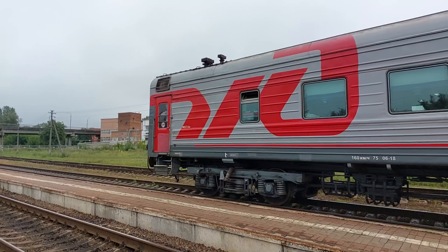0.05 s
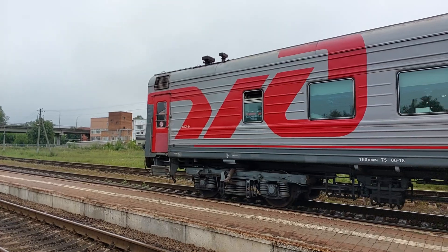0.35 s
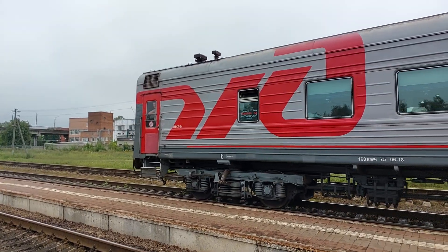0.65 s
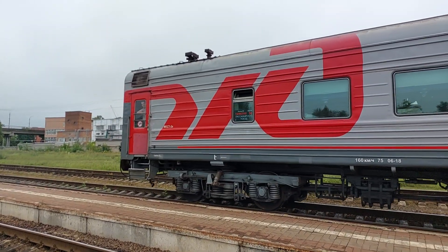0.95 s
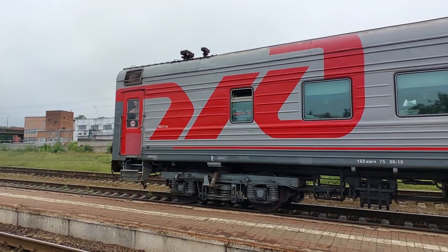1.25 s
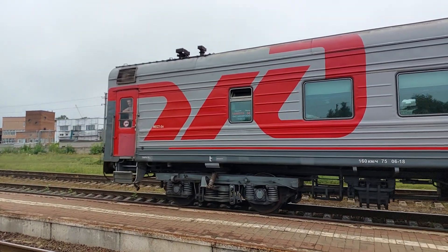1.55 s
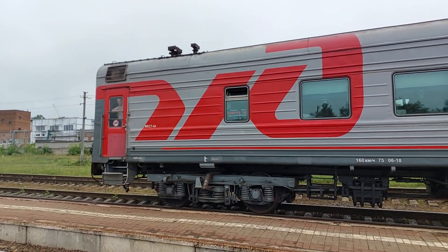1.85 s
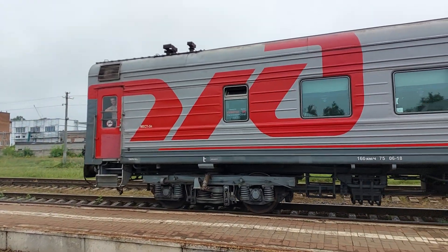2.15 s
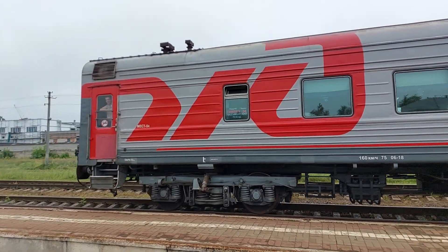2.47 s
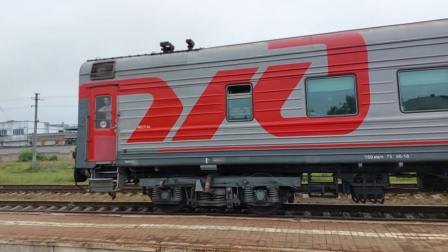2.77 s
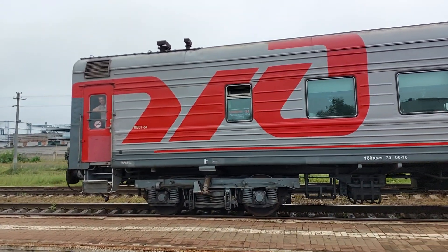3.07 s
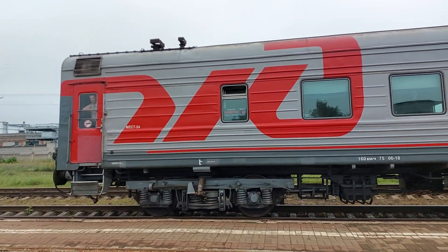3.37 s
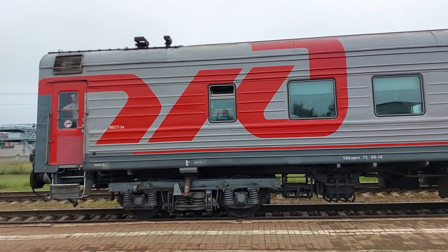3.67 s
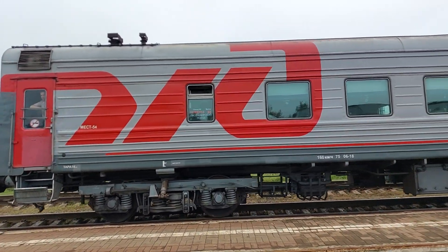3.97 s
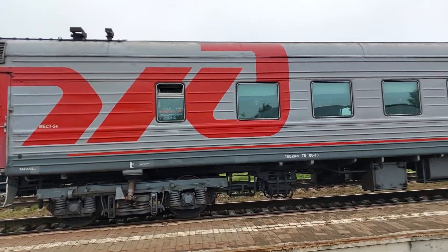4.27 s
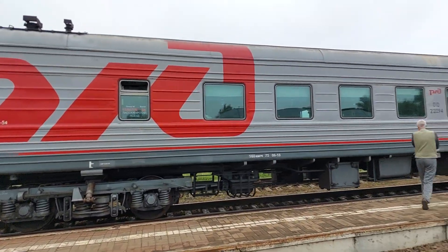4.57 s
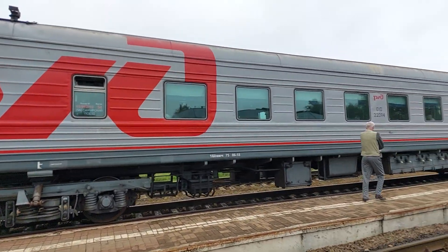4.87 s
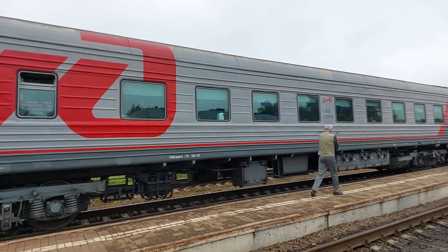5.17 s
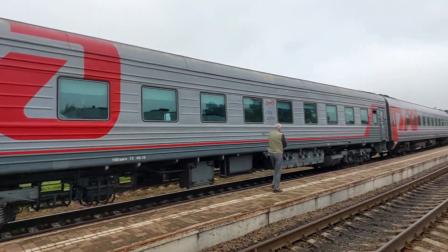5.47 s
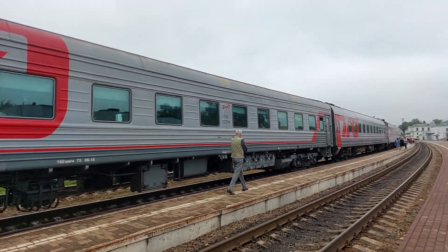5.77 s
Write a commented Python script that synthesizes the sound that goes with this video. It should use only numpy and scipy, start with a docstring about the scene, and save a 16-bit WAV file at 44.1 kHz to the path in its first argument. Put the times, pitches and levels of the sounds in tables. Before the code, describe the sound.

High brake squeals ring over a slow passenger train's rumble, then air hisses and the coaches knock and thump to a halt.

```python
"""A low rumble of wheels, the rush of a fan and a thin converter whine: passenger coaches creep along an
open-air platform. A brake shoe scrapes a wheel and sets it ringing, and wheel after wheel squeals as it
sticks and slips. Air hisses from the brake valve, the running gear clanks, and the hollow coach body
booms and thumps as the train comes to rest under the last squeals."""
import sys
import numpy as np
from scipy import signal
from scipy.fft import rfft, irfft, next_fast_len
from scipy.io import wavfile
from scipy.ndimage import uniform_filter1d, map_coordinates

SR = 44100
rng = np.random.default_rng(int(sys.argv[2]) if len(sys.argv) > 2 else 0)


def to_wav(sig):
    """Store sig (one row per channel, or 1-D mono) as 16-bit WAV at the path in sys.argv[1].

    Samples outside -1..1 are clipped; the rate is SR.
    """
    pcm = np.clip(np.atleast_2d(sig), -1, 1) * 32767
    pcm = np.round(pcm).astype(np.int16)
    wavfile.write(sys.argv[1], SR, pcm.T)  # frames by channels


N = 261513
TIME = np.arange(N) / SR

# Table levels are relative: each layer adds its own gain.
# rolling bed: t/s, deep rumble/dB, body noise/dB
ROLL_LEVEL = [(0.0, -32, -38.5), (1.01, -28.5, -38), (1.53, -36, -43), (3.35, -31.5, -39.5),
              (4.46, -32.5, -39), (4.51, -27.5, -37.5), (4.89, -32, -40), (4.94, -36, -37.5),
              (5.05, -27, -39.5), (5.14, -30.5, -36), (5.25, -24, -34.5), (5.47, -29.5, -35),
              (5.5, -22, -34.5), (5.6, -30.5, -35), (5.75, -24, -37), (5.78, -27.5, -34.5),
              (5.93, -28, -37)]
# colour of the deep rumble: f/Hz, level/dB
DEEP_COLOUR = [(28, -18), (37, -3.5), (44, 2.5), (64, 2), (80, -6), (92, -8.5), (120, -11), (138, -4),
               (170, -23)]
# colour of the body noise: f/Hz, level/dB
BODY_COLOUR = [(150, -7), (200, -10), (275, -7.5), (400, -11), (520, -13.5), (590, -17), (800, -15.5),
               (950, -16), (1150, -22.5), (1500, -37.5)]
# direction of the coach: t/s, lead at the left ear/ms
BEARING = [(0, 0.49), (1.3, 0.51), (3.3, .51), (4.9, 0.35), (5.9, 0.18)]
# rush of the fan: t/s, level/dB
FAN_LEVEL = [(0, -49.5), (1.3, -49), (2.1, -52), (2.7, -51), (3.4, -47.5), (5.0, -49), (5.5, -45.5),
             (5.93, -49.5)]
# colour of the fan: f/Hz, level/dB
FAN_COLOUR = [(900, -7), (1100, -13), (1400, -4), (1710, 1), (2170, -2.5), (2500, -3), (2800, -7.5),
              (3800, -11), (4600, -14), (5200, -13.5), (6300, -20.5), (7400, -29.5), (12000, -40)]
# the converter's narrow beam sweeps past: t/s, level/dB, left-right/dB
WHINE_LEVEL = [(0.0, -27.5, -16), (0.32, -26, 4), (0.48, -24.5, -12), (0.96, -28, -4), (1.04, -22.5, -11),
               (1.44, -25, 0), (1.6, -22.5, -17), (1.76, -28, -1), (2.48, -32, -11), (2.56, -35.5, -12),
               (2.88, -26, 7), (3.2, -23, -15), (3.44, -27, 4), (3.56, -27, 2), (4.32, -36, 3),
               (4.84, -59, -27)]
# grain of the whine: t/s, noisy share/0-1
WHINE_ROUGHNESS = [(1.8, 0.24), (2.8, 0.12), (4.8, 0)]
# the lowest wheel mode locks on under the shoe: start/s, rise/s, hold/s, fall/s, f/Hz, level/dB
GROAN = (1.0, 0.54, 0.14, 0.46, 2271, -40)
# its twin joins: start/s, rise/s, hold/s, fall/s
GROAN_TWIN = (1.334, 0.21, 0.24, 0.15)
# single wheels squeal: start/s, rise/s, hold/s, fall/s, f/Hz, glide/(Hz/s), level/dB, noisy share/0-1,
# throb rate/Hz (either sign), left-right/dB
SQUEALS = [(1.108, 0.042, .04, 0.23, 13005, 0, -39, 0.35, -1, 0),
           (1.122, 0.12, 0.09, .05, 3398, -2, -43, 0.1, 0, -5),
           (1.36, 0.022, 0.3, .07, 3399, -23, -45, 0, 1, 0),
           (1.122, 0.086, 0.18, 0.09, 10740, -5, -45.5, 0.24, -1, 2),
           (1.452, 0.12, .05, 0.44, 12995, 3, -46, 0.3, 3.5, 10),
           (1.78, .035, 0.059, .04, 4545, 0, -50, 0, 15, 6),
           (2.217, 0.029, 0.015, 0.066, 5310, -500, -42, 0.64, 7, -5),
           (2.314, 0.026, .01, .07, 5180, -1500, -43.5, 0.8, 2, -5),
           (2.671, 0.061, 0.41, 0.39, 7915, -100, -57, 0.59, -0.5, -5),
           (3.023, 0.06, 0.064, 0.13, 12520, 300, -55, 0.6, 0, -5),
           (3.136, 0.2, 0.012, 0.16, 4400, 90, -51.5, 0.4, -6.5, 18),
           (3.312, .07, .09, .1, 12680, 500, -55.5, .7, 0, -4),
           (3.368, 0.16, 0.13, 0.083, 6390, -200, -45.5, 0.47, 3.5, -5),
           (3.537, 0.11, 0.24, 0.096, 12640, -100, -51.5, 0.64, 0.5, -2.5),
           (4.645, 0.076, 0.07, 0.2, 5400, -250, -44.5, 0.16, 3, 8),
           (4.79, 0.086, 0.13, 0.24, 6010, 0, -39.5, 0.15, 10.5, -1.5),
           (5.024, 0.051, 0.039, 0.05, 6010, 0, -30, 0, -2, -2.5),
           (5.125, 0.053, 0.027, 0.034, 6010, 0, -26, 0.01, 0, -4.5),
           (5.23, 0.028, 0.11, 0.13, 6000, 0, -33, 0, -0.5, -5),
           (5.037, 0.065, 0.14, 0.087, 5148, 3, -32.5, 0.28, 16.5, 4),
           (5.24, .06, .04, .1, 6810, -900, -46, 0.5, 0, 3),
           (5.478, 0.059, 0.22, 0.14, 6011, 1, -44.5, 0.05, 1, 3),
           (5.35, 0.21, 0.41, .1, 6130, 4, -54, 0.14, 2.5, 0)]
# the shoe bites on a wheel: start/s, rise/s, hold/s, fall/s, wheel drive/dB, dry rasp/dB
SHOE_BITES = [(1.111, 0.0048, 0.83, 0.19, -44, -50), (1.664, 0.14, .08, 0.05, -43, -44),
              (2.253, 0.05, 0.034, 0.097, -62, -53.5)]
# colour of the dry rasp: f/Hz, level/dB
RASP_COLOUR = [(3500, 3), (5000, -14), (6300, 8), (7700, -13), (9000, -8), (11000, -2), (13000, -11),
               (15500, -5)]
# strongest wheel modes: f/Hz, level/dB
WHEEL_MODES = [(2892, -68.5), (3400, -62), (4054, -70), (4151, -64), (4544, -65.5), (4807, -72),
               (4930, -71), (5060, -64), (5600, -68), (5685, -72), (5808, -59), (5969, -65), (6207, -67),
               (6535, -63), (6745, -68), (6794, -66), (6919, -59), (6998, -67), (7511, -63), (7601, -62),
               (7724, -62), (7770, -62), (7919, -75), (8522, -72), (8619, -70), (8812, -65), (8947, -73),
               (9504, -68), (9771, -74), (10460, -67.5), (10740, -62.5), (11060, -67), (11290, -72),
               (11396, -59), (11490, -70), (11676, -68), (11843, -68), (11920, -72), (12130, -70),
               (12220, -70), (12306, -63), (12586, -70), (12742, -66), (12800, -69), (12974, -60),
               (13194, -64), (13370, -67), (13680, -69), (13840, -68), (14137, -64), (14290, -66),
               (14420, -67), (14540, -66), (14696, -67), (14927, -63)]
# contour of the crowd of weaker modes: f/Hz, level/dB
WHEEL_CROWD = [(5400, -78), (7700, -75), (9200, -83), (12000, -80), (15700, -70)]
# blows in the running gear: t/s, level/dB, low-pass corner/Hz, time to fall 40 dB/s, dry crack/dB
CLANKS = [(2.285, -44.5, 3050, 0.066, -16), (2.713, -35, 600, .04, -16), (2.718, -32, 1500, 0.042, -15),
          (2.724, -29.5, 800, 0.032, -17), (2.733, -41.5, 2200, 0.13, -13), (2.764, -41.5, 900, 0.094, -16),
          (5.101, -42, 4500, 0.067, 3.5), (5.221, -38.5, 700, 0.25, -2), (5.441, -32, 300, 0.083, -23),
          (5.515, -48, 356, 0.2, -19), (5.549, -52, 1790, 0.018, -9), (5.617, -43, 1500, .02, -15)]
# modes of the bogie frame: f/Hz, width/Hz, level/dB
FRAME_MODES = [(308, 43, 0), (776, 80, 8.5), (900, 99, 6.5), (1023, 69, 5.5), (1294, 30, -4),
               (1480, 56, 2.5), (1680, 110, -1), (2060, 37, 7), (2230, 270, 0.5), (2990, 220, -4),
               (3420, 71, -3), (3650, 160, -2.5), (5150, 670, -11)]
# wheels further down the train, close in pitch: f/Hz, level/dB
FAR_WHEELS = [(5015, -3), (5200, -2.5), (5288, 1.5), (5333, 1), (5381, -9.5), (5676, -13)]
# their chorus: t/s, level/dB
FAR_LEVEL = [(3.15, -63), (3.45, -67), (3.75, -51), (4.1, -57.5), (4.3, -54), (4.55, -60), (5.0, -49),
             (5.15, -50), (5.4, -51.5), (5.95, -61)]
# one wheel sings through the stop: t/s, f/Hz, level/dB, octave level/dB, octave left-right/dB
LONG_SQUEAL = [(3.2, 5180, -53, -71, -2), (3.45, 5200, -56, -57, 2), (3.63, 5220, -57, -49, 5),
               (3.69, 5168, -59, -48, 9), (3.95, 5180, -47.5, -47, -1), (4.21, 5196, -59, -48.5, -3.5),
               (4.26, 5300, -44, -46, -5), (4.35, 5330, -61, -44, -5), (4.5, 5325, -53, -48, -4),
               (4.76, 5332, -55, -48, -12), (5.02, 5260, -47, -53, -6), (5.08, 5100, -54, -49, -7),
               (5.25, 5148, -39, -55, -6), (5.4, 5146, -41, -61.5, -8), (5.95, 5150, -51, -65.5, -8)]
# air let out of the brakes: start/s, rise/s, hold/s, fall/s, level/dB
AIR_BURSTS = [(4.386, 0.21, 0.47, 0.33, -46.5), (5.63, 0.044, 0.0058, 0.07, -64)]
# colour of the hiss: f/Hz, level/dB
AIR_COLOUR = [(1200, 3), (2400, 4), (4000, 4.5), (5500, 4.5), (7500, -1.5), (9000, -9), (11000, 0),
              (13500, 2.5), (15700, 0)]
# the coach body booms as it rocks to a halt: start/s, rise/s, hold/s, fall/s
BOOM_SWELL = (4.8, 0.32, 0.62, 0.61)
# jolts of the stop: t/s, level/dB
JOLTS = [(5.103, -35), (5.23, -27.5), (5.298, -35), (5.37, -36)]
# modes of the coach body: f/Hz, width/Hz, level/dB
COACH_MODES = [(150.5, 27, -0.5), (364, 54, -5.5), (506, 45, -6)]
# rods and springs ring: crest/s, f/Hz, level/dB, Gaussian width/s
RIGGING_NOTES = [(5.24, 2530, -42.5, 0.027), (5.235, 3090, -46, 0.015), (5.225, 1580, -46, 0.018),
                 (5.15, 950, -39.5, 0.021), (5.372, 953, -37, 0.028)]
# the last wheel's bending squeal: t/s, f/Hz, level/dB
LAST_SQUEAL = [(5.19, 6860, -57), (5.22, 6720, -53), (5.31, 6730, -38), (5.37, 6670, -42),
               (5.47, 6630, -36.5), (5.6, 6680, -46), (5.72, 6670, -41.5), (5.8, 6700, -38),
               (5.85, 6745, -46), (5.95, 6735, -56)]

SWELL_DB = 17   # a swell climbs this far in its rise time and sinks this far in each fall time
WAVER_HZ = 10.5   # speed of a squeal's pitch waver


def from_db(db):
    """Decibels to gain."""
    return 10 ** (np.asarray(db) / 20)


def unit_power(x):
    """Scale to unit power."""
    return x / np.sqrt(np.mean(np.abs(x) ** 2) + 1e-20)


def in_time(rows):
    """The columns of a curve at every sample."""
    times, *columns = np.transpose(rows)
    return [np.interp(TIME, times, column) for column in columns]


def during(rows, fade_s=0.0026):
    """A gate that is open while a curve lasts, fading at both ends."""
    return np.clip(np.minimum(TIME - rows[0][0], rows[-1][0] - TIME) / fade_s, 0, 1)


def swell(start, rise, hold, fall):
    """Envelope of one rise, hold and fall, straight in decibels after a short fade-in."""
    age = TIME - start
    below = np.maximum(1 - age / rise, 0) + np.maximum((age - rise - hold) / fall, 0)
    return from_db(-SWELL_DB * np.minimum(below, 10)) * np.clip(3 * age / rise, 0, 1)


def flutter(width_hz, size=N):
    """Complex random envelope of a resonance: the wider, the faster it flickers; unit power."""
    step, settle = 16, 4000
    r = np.exp(-np.pi * width_hz * step / SR)
    white = rng.standard_normal((2, size * 0 + N // step + settle + 2))
    slow = signal.lfilter([1], [1, -2 * r, r * r], white[0] + 1j * white[1])[settle:]
    return np.interp(np.arange(size) / step, np.arange(len(slow)), unit_power(slow))


def panned(pan_db):
    """Left and right gains for a level difference."""
    return from_db(np.array([[.5], [-.5]]) * pan_db)


def outdoor_noise(spectrum, direct, spacing_ms=0.56):
    """Coloured noise: the direct share comes straight from the coach, the rest from all around."""
    size = next_fast_len(N)
    hz = np.arange(size // 2 + 1) * SR / size + 1e-3
    points, level_db = np.transpose(spectrum)
    skirts = np.minimum(hz / points[0], 1) ** 4 * np.minimum(points[-1] / hz, 1) ** 8
    colour = from_db(np.interp(np.log(hz), np.log(points), level_db)) * skirts
    alike = np.sinc(2 * hz * spacing_ms / 1000)   # scattered long waves reach both ears alike
    shares = np.sqrt([np.ones_like(hz), (1 + alike) / 2, (1 - alike) / 2])
    white = rfft(rng.standard_normal((3, size)))
    straight, mid, side = irfft(white * colour * shares, size)[:, :N]
    lag = in_time(BEARING)[0] * SR / 1000
    late = map_coordinates(straight, [np.arange(N) - lag], order=2, mode="mirror")
    scattered = np.array([mid + side, mid - side])
    return unit_power(np.sqrt(direct) * np.array([straight, late]) + np.sqrt(1 - direct) * scattered)


def resonate(x, hz, width_hz):
    """A resonance with gain one at its peak."""
    r = np.exp(-np.pi * width_hz / SR)
    feedback = [1, -2 * r * np.cos(2 * np.pi * hz / SR), r * r]
    return signal.lfilter(np.array([1, 0, -1]) * (1 - r * r) / 2, feedback, x + 1e-18)


def tone(hz, noisy, width_hz, ear_phase):
    """A self-sustained vibration: a clean core and an unsteady part that differs at each ear."""
    core = np.sqrt(1 - noisy) * np.exp(1j * np.array([[0], [1]]) * ear_phase)
    unsteady = np.sqrt(noisy) * np.array([flutter(width_hz, len(hz)), flutter(width_hz, len(hz))])
    carrier = np.exp(2j * np.pi * np.cumsum(hz) / SR)
    return np.sqrt(2) * np.real((core + unsteady) * carrier)


def rolling(deep_gain_db=-0.9, body_gain_db=1.5, jolt_db=0.63, body_pan_db=1.4):
    """The low bed: heavy wheels shake the track and the coach bodies."""
    deep_db, body_db = in_time(ROLL_LEVEL)
    deep = outdoor_noise(DEEP_COLOUR, direct=0.11)
    power = uniform_filter1d(np.mean(deep ** 2, axis=0), size=SR // 6)
    deep = deep / np.sqrt(power)   # the weight keeps the rumble even
    body = outdoor_noise(BODY_COLOUR, direct=0.39)
    body = body * from_db(jolt_db * flutter(21).real) * panned(body_pan_db)
    return from_db(deep_db + deep_gain_db) * deep + from_db(body_db + body_gain_db) * body


def fan(gain_db=4.5):
    """Steady rush of underfloor ventilation."""
    return from_db(in_time(FAN_LEVEL)[0] + gain_db) * outdoor_noise(FAN_COLOUR, direct=0.55)


def converter_whine(gain_db=1.0, hz=15275, sag_hz_per_s=4.5, roll_from_s=3.07, turns_per_s=2.25):
    """Switching whine: it sags, wanders between the ears, then rolls in phase as it draws level."""
    level_db, pan_db = in_time(WHINE_LEVEL)
    ears = panned(pan_db) / np.sqrt(np.mean(panned(pan_db) ** 2, axis=0))
    wander = np.clip(roll_from_s - TIME, .2, 1) * flutter(7).real
    turns = turns_per_s * np.maximum(TIME - roll_from_s, 0)
    ear_phase = 1.3 + 1.4 * wander - 2 * np.pi * turns
    whine = tone(hz - sag_hz_per_s * TIME, in_time(WHINE_ROUGHNESS)[0], width_hz=68, ear_phase=ear_phase)
    return from_db(level_db + gain_db) * ears * during(WHINE_LEVEL) * whine


def supply_hum(level_db=-41, hz=100.2):
    """Low hum of the coach's power supply."""
    return from_db(level_db) * tone(np.full(N, hz), noisy=0.24, width_hz=6.8, ear_phase=-0.14)


def groan(gain_db=4.0, twin_db=-5.5, split_hz=26, noisy=.07, width_hz=30, waver_db=1.6):
    """The wheel's lowest mode is a close pair: one starts shakily, its twin joins under load; they beat."""
    *shape, pitch_hz, level_db = GROAN
    hz = np.full(N, pitch_hz)
    waver = from_db(waver_db * flutter(24).real)
    first = swell(*shape) * waver * tone(hz - split_hz / 4, noisy, width_hz, ear_phase=-1.66)
    twin = swell(*GROAN_TWIN) * tone(hz + split_hz * 3 / 4, noisy, width_hz, ear_phase=-1.06)
    return from_db(level_db + gain_db) * (first + from_db(twin_db) * twin)


def squeals(throb_depth_db=11, waver_share=0.0015, clean_width_hz=19, rough_width_hz=160):
    """Stick and slip locks each wheel onto one mode; rough squeals waver more and spread wider."""
    out = np.zeros((2, N))
    for start, rise, hold, fall, hz, glide, level_db, noisy, throb_hz, pan_db in SQUEALS:
        span = slice(int(start * SR), int((start + rise + hold + 2 * fall) * SR))
        since_crest = TIME[span] - start - rise
        waver = waver_share * noisy * flutter(WAVER_HZ, len(since_crest)).real
        pitch = (hz + glide * since_crest) * (1 + waver)
        width_hz = clean_width_hz + rough_width_hz * noisy ** 2
        voice = tone(pitch, noisy, width_hz, ear_phase=-0.25 - 4.2 * noisy)
        throb_db = -throb_depth_db * np.sin(np.pi * throb_hz * since_crest) ** 4
        envelope = from_db(level_db + throb_db) * swell(start, rise, hold, fall)[span]
        out[:, span] += envelope * panned(pan_db) * voice
    return out


def wheel_modes(strong_t60_s=.56, crowd_t60_s=0.34, count=60):
    """A disc's strong modes and an about evenly spaced crowd of weak ones: f/Hz, level/dB, T60/s."""
    low_hz, high_hz = WHEEL_CROWD[0][0], WHEEL_CROWD[-1][0]
    places = (np.arange(count) + rng.random(count)) / count
    crowd_hz = low_hz + places * (high_hz - low_hz)
    crowd_db = np.interp(crowd_hz, *np.transpose(WHEEL_CROWD)) + rng.normal(0, 2.5, count)
    strong = [(hz, db, strong_t60_s) for hz, db in WHEEL_MODES]
    return strong + [(hz, db, crowd_t60_s) for hz, db in zip(crowd_hz, crowd_db)]


def shoe_scrape(rasp_gain_db=-2.0, ring_gain_db=48, judder_db=.8, flare_db=3, pan_db=-3.0):
    """The shoe's friction rasps and feeds the wheel's modes, which flare and ring on after it lets go."""
    bites = [(swell(*shape), drive_db, rasp_db) for *shape, drive_db, rasp_db in SHOE_BITES]
    drive = np.sqrt(sum((envelope * from_db(db)) ** 2 for envelope, db, _ in bites))
    rasp = np.sqrt(sum((envelope * from_db(db)) ** 2 for envelope, _, db in bites))
    grip = from_db(judder_db * flutter(27).real)
    span = slice(int(SHOE_BITES[0][0] * SR), int((SHOE_BITES[-1][0] + 1) * SR))
    friction = (drive * grip * rng.standard_normal((2, N)))[:, span]
    modes = wheel_modes()
    flares = [from_db(flare_db * flutter(18, friction.shape[1]).real) for _ in range(17)]
    out = from_db(rasp_gain_db) * rasp * grip * outdoor_noise(RASP_COLOUR, direct=0.17)
    for k, (hz, db, t60) in enumerate(modes):
        width_hz = np.log(1000) / (np.pi * t60)
        ring = resonate(friction, hz, width_hz) / np.sqrt(np.pi * width_hz / SR)   # same power at any width
        out[:, span] += from_db(db + ring_gain_db) * flares[k % len(flares)] * ring
    return out * panned(pan_db)


def clanks(gain_db=14, chatter_db=4.5, crack_gain_db=16, crack_chatter_db=1.5):
    """Each blow cracks and dies away in a rattle of small contacts that ring the bogie frame."""
    blows, cracks = np.zeros((2, 2, N))
    for start, level_db, corner_hz, decay_s, crack_db in CLANKS:
        age = TIME - start
        envelope = from_db(level_db - 40 * np.clip(age / decay_s, 0, 5)) * (age >= 0)
        rattle = rng.standard_normal((2, N)) * envelope
        pole = np.exp(-2 * np.pi * corner_hz / SR)
        blow = signal.lfilter([1 - pole], [1, -pole], rattle + 1e-18)
        blows += blow
        cracks += from_db(crack_db) * blow
    chatter = from_db(gain_db + chatter_db * flutter(190).real)
    blows = (blows + .5 * blows[::-1]) * chatter   # crossfeed narrows the image
    cracks *= from_db(crack_gain_db + crack_chatter_db * flutter(210).real)
    frame = sum((-1) ** k * from_db(db) * resonate(blows, hz, width_hz)
                for k, (hz, width_hz, db) in enumerate(FRAME_MODES))
    return frame + signal.sosfilt(signal.butter(2, [250, 7000], "band", fs=SR, output="sos"), cracks)


def far_wheels(flare_db=1.5, pan_db=1.0, octave_db=-12, upper_mode_hz=10310, reach_hz=140):
    """Distant wheels hold fine, wavering tones; those near half the upper mode add their octave."""
    out = 0
    for hz, level_db in FAR_WHEELS:
        pitch = hz * (1 + .004 * flutter(5).real)
        voice = tone(pitch, noisy=.5, width_hz=50, ear_phase=-2.4)
        octave = from_db(octave_db) * tone(2 * pitch, noisy=1.0, width_hz=77, ear_phase=-5.1)
        in_reach = abs(hz - upper_mode_hz / 2) < reach_hz
        out += from_db(level_db + flare_db * flutter(16).real) * (voice + octave * in_reach)
    return from_db(in_time(FAR_LEVEL)[0]) * during(FAR_LEVEL) * panned(pan_db) * out


def long_squeal(gain_db=-0.5, pan_db=1.5, waver_share=0.00142):
    """One wheel squeals thinly to the stop, hopping in pitch; its octave often leads until near the end."""
    hz, level_db, octave_db, octave_pan_db = in_time(LONG_SQUEAL)
    hz = hz * (1 + waver_share * flutter(WAVER_HZ).real)
    fundamental = from_db(level_db) * tone(hz, noisy=0.45, width_hz=92, ear_phase=-1.6)
    octave = from_db(octave_db) * tone(2 * hz, noisy=0.62, width_hz=61, ear_phase=-2.03)
    voice = panned(pan_db) * fundamental + panned(octave_pan_db) * octave
    return from_db(gain_db) * during(LONG_SQUEAL) * voice


def brake_air(gain_db=5.5, leak_db=-71, pan_db=-2.5, sputter_db=2.3, sputter_hz=35):
    """A slightly sputtering jet from the brake valve, which closes to a faint leak and puffs once more."""
    start, rise = AIR_BURSTS[0][:2]
    bursts = sum(from_db(db) * swell(*shape) for *shape, db in AIR_BURSTS)
    leak = from_db(leak_db) * np.clip((TIME - start) / rise, 0, 1)
    sputter = from_db(gain_db + sputter_db * flutter(sputter_hz).real)
    return sputter * (bursts + leak) * outdoor_noise(AIR_COLOUR, direct=0.11) * panned(pan_db)


def coach_boom(level_db=-41, hz=215, width_hz=70):
    """The hollow body of the coach, shaken by the stop."""
    resonance = np.sqrt(2) * np.real(flutter(width_hz) * np.exp(2j * np.pi * hz * TIME))
    return from_db(level_db) * swell(*BOOM_SWELL) * resonance


def coach_thumps(gain_db=23, shake_s=0.025):
    """The coach lurches against its bogies: each jolt is a short shudder that rings the body's low modes."""
    force = sum(from_db(db) * np.exp(-np.abs(TIME - t) / shake_s) * (TIME >= t) for t, db in JOLTS)
    shudder = force * (rng.standard_normal(N) + .5 * rng.standard_normal((2, N)))
    body = sum(from_db(db) * resonate(shudder, hz, width_hz) for hz, width_hz, db in COACH_MODES)
    return from_db(gain_db) * body


def rigging_rings():
    """Short metallic notes as the rods and springs of the brake rigging take up the load."""
    out = 0
    for crest, hz, level_db, width_s in RIGGING_NOTES:
        envelope = from_db(level_db) * np.exp(-.5 * ((TIME - crest) / width_s) ** 2)
        out += envelope * tone(np.full(N, hz), noisy=0.37, width_hz=82, ear_phase=-0.39)
    return out


def last_squeal(gain_db=2.5, pan_db=0.5):
    """One wheel sings on, bending in pitch, while the coach settles."""
    hz, level_db = in_time(LAST_SQUEAL)
    voice = tone(hz, noisy=0.19, width_hz=70, ear_phase=-2.3)
    return from_db(level_db + gain_db) * during(LAST_SQUEAL) * panned(pan_db) * voice


def scene():
    """The platform mix: singing wheels over the coach's bed, with the hiss and knocks of the stop."""
    wheels = shoe_scrape() + groan() + squeals() + long_squeal() + far_wheels() + last_squeal()
    bed = rolling() + coach_boom() + fan() + converter_whine() + supply_hum()
    return bed + wheels + brake_air() + clanks() + coach_thumps() + rigging_rings()


def record(dry, port_hz=6100, port_width_hz=1500, port_gain=0.5, low_cut_hz=33, high_cut_hz=15850):
    """The two microphone ports differ in upper presence; the deepest bass and the top are cut."""
    presence = port_gain * resonate(dry, port_hz, port_width_hz)
    coloured = dry + np.array([[1], [-1]]) * presence
    coloured = signal.sosfilt(signal.butter(5, low_cut_hz, "high", fs=SR, output="sos"), coloured)
    return signal.sosfilt(signal.ellip(12, .1, 80, high_cut_hz, fs=SR, output="sos"), coloured)


dry = scene()
out = record(dry)
to_wav(out)
```